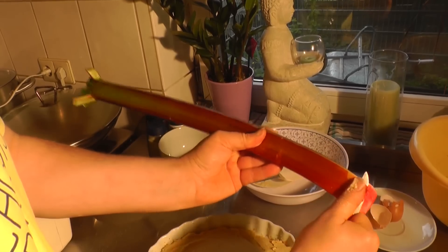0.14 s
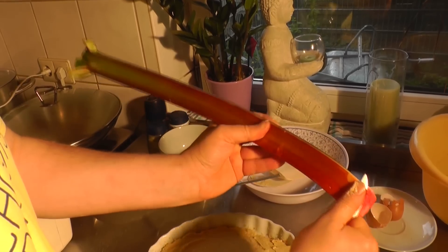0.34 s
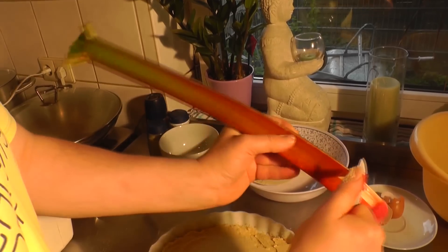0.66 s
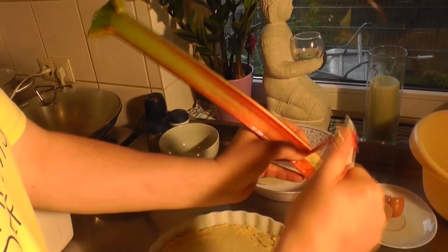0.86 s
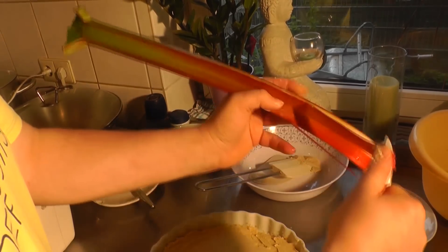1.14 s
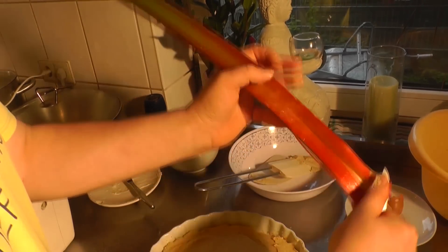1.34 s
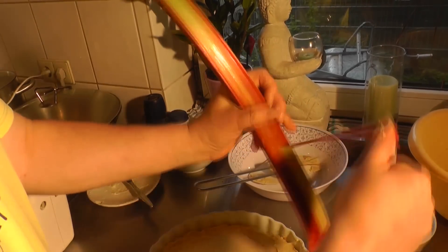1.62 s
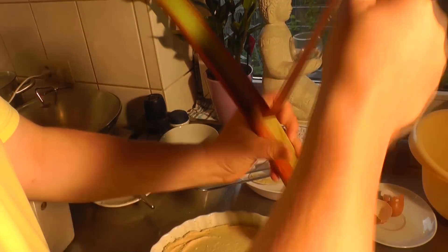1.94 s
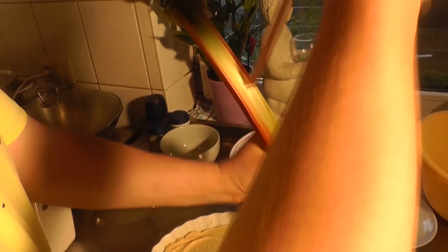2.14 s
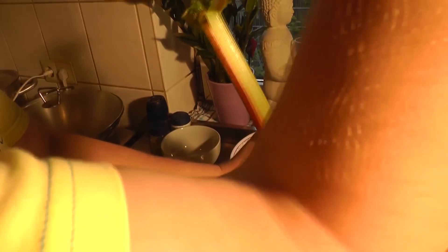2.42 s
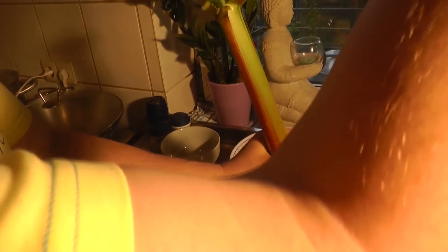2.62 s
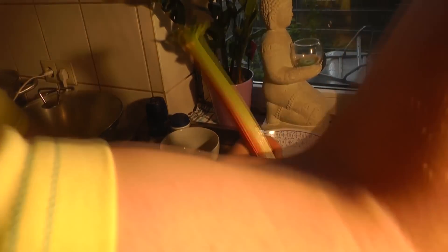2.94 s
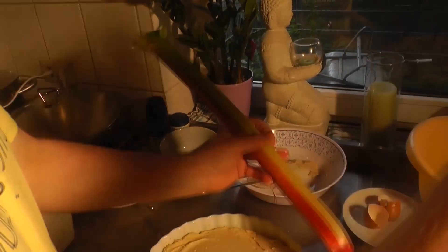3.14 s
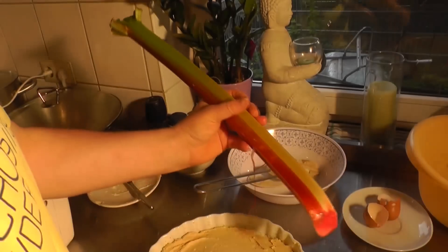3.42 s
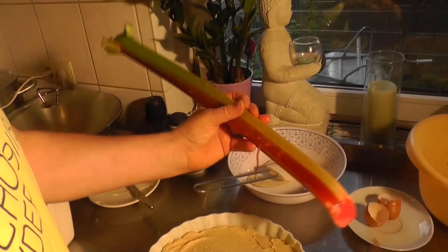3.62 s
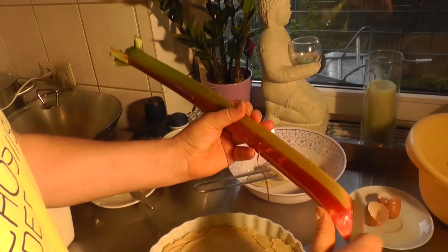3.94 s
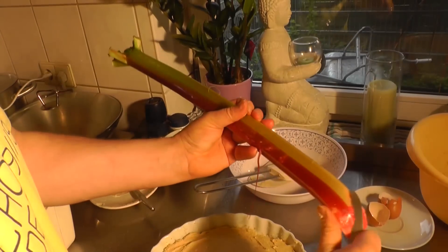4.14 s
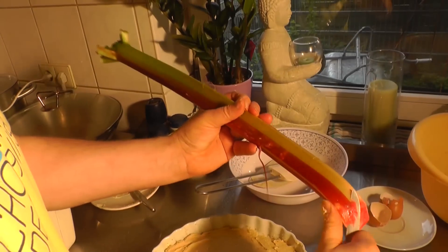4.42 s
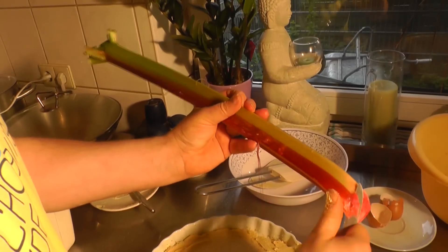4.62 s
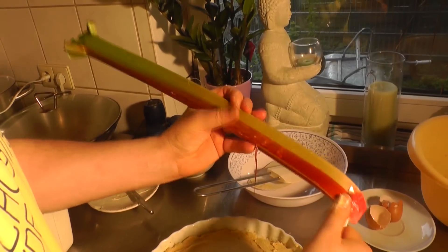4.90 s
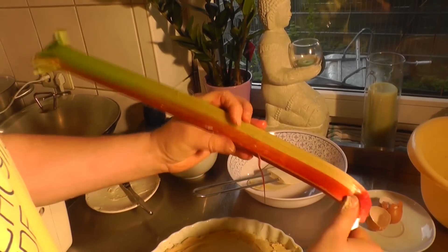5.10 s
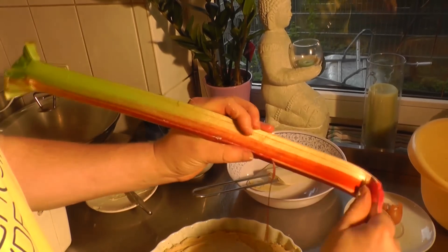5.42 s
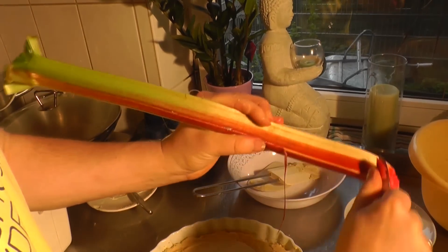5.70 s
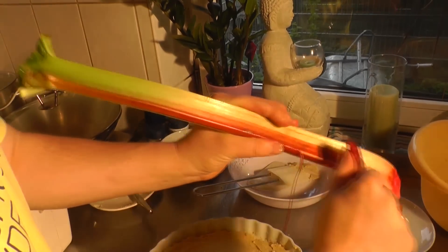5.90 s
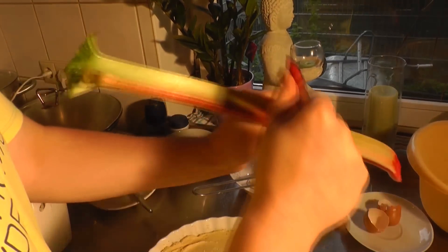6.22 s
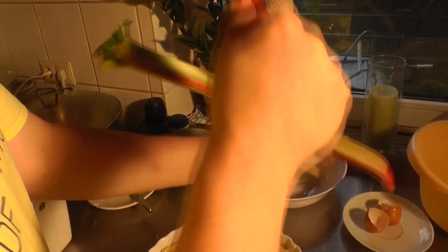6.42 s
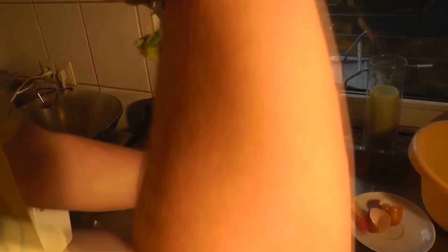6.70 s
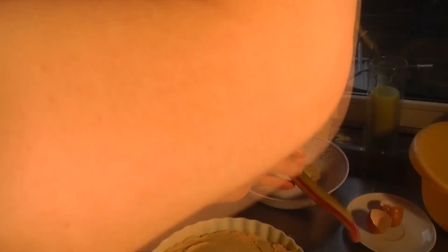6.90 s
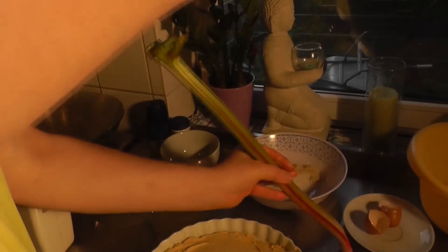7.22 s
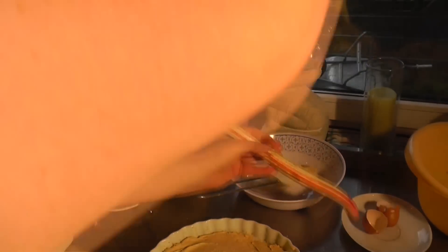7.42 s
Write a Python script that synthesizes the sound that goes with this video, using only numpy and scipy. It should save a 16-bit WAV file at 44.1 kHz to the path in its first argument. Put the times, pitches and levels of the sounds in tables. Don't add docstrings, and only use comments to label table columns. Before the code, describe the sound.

Stereo microphones stand close on the worktop. Short crisp rips and a tap come first, then a longer crackling pull ending in a loud thud with cupboard shudder and ringing dishes. Small knocks, clusters of dry snaps and a thin whistling peel follow. A dense tear leads to a final burst of thuds, clatter and wet ripping, over low traffic rumble and a quiet steady whine.

```python
import sys
import numpy as np
from scipy import signal
from scipy.fft import rfft, irfft, next_fast_len
from scipy.io import wavfile

SR = 44100
rng = np.random.default_rng(int(sys.argv[2]) if len(sys.argv) > 2 else 0)


def int16_out(signal):
    q = np.round(np.clip(np.atleast_2d(signal).T, -1, 1) * 32767)
    wavfile.write(sys.argv[1], SR, q.astype(np.int16))


def ratio(d):
    e = np.asarray(d, float) / 20
    return 10 ** e


N = 333340

# f/Hz, level/dB per Hz
FLOOR_SPECTRUM = [(12, -15), (30, -6), (123, 2.5), (204, -8), (357, 1.5), (825, -1), (1190, -7.5),
                  (1910, -3.5), (2140, -5.5), (2670, -1), (3950, -12), (5230, -8.5), (6910, -26),
                  (16000, -11)]
FLOOR_DB = -55.5
# f/Hz, width/Hz, level/dB rms
APPLIANCE_WHINE = [(2610, 170, -70), (2730, 130, -70), (1940, 43, -75), (3350, 94, -81)]

# closest t/s, rumble level/dB, tyre roar/dB re rumble, pane hum/dB re rumble, reach/s
PASSES = [(.02, -67, 2.5, -15, 0.086), (.52, -77, -12, 10, 0.14), (.8, -80, 4, 21, 0.15),
          (1.3, -62.5, 7.5, -3.5, 0.47), (1.75, -66, 10, -13, 0.22), (2.25, -77.5, 10.5, 5.5, 0.3),
          (2.85, -72, -13, -16, 0.16), (3.45, -65.5, 1, -1.5, 0.64), (4.35, -72, 17, 5, 0.045),
          (5.0, -55, 1, -18, 0.15), (5.22, -55.5, -1.5, 3.5, 0.11), (5.48, -54, -3.5, -13, 0.23),
          (5.8, -56, -7.5, -8, 0.19), (6.2, -70.5, 9.5, 6, 0.24), (6.65, -64, 9.5, -25, 0.25),
          (6.87, -64.5, 10, -4, 0.16)]
PASS_FALL_DB = 28.5
# f/Hz, level/dB per Hz
RUMBLE_SPECTRUM = [(53, -50.5), (90, -27), (162, -12), (269, -3.5), (454, -5.5), (706, -5.5), (999, -16.5),
                   (1600, -16), (1800, -29), (2200, -9), (2860, -39.5), (4840, -120)]
# f/Hz, width/Hz, level/dB
WINDOW_PEAKS = [(266, 15, -7.5), (309, 28, -2), (352, 69, 3), (491, 30, 1.5), (700, 74, 4.5),
                (939, 25, -2.5), (1196, 37, -3), (1375, 37, -1)]
PANE_HZ, PANE_WIDTH_HZ, ROAR_FROM_HZ = 210, 24, 329
# t/s, level/dB
BRAKE_SQUEAL = [
    (1.0, -90),
    (1.12, -62),
    (1.45, -58),
    (1.8, -74),
    (1.95, -90),
]
SQUEAL_HZ, SQUEAL_WIDTH_HZ = 1770, 42
# start t/s, length/s, start f/Hz, end f/Hz, level/dB
ENGINES = [
    (1.85, 0.52, 71.6, 76, -73),
    (4.51, 0.42, 67, 68.5, -72),
    (5.208, 0.35, 69.1, 73, -69),
    (5.84, .03, 76, 76, -82),
]
ENGINE_SWELL_DB_PER_S, ENGINE_FADE_DB_PER_S = 52, 149
# t/s, rumble level/dB, clatter/dB re rumble, hum/dB re rumble
SHUDDERS = [
    (2.55, -53.5, 3.5, -3),
    (3.07, -58, 3.5, 6),
    (3.24, -68, 0, 14),
    (3.7, -67, 8, -1),
    (3.8, -72, 6, 11),
    (7.05, -61, 19, -5),
    (7.19, -49, -25, 3),
    (7.27, -52, -3, 8),
    (7.54, -75.5, 18.5, -3),
]
SHUDDER_SWELL_DB_PER_S, SHUDDER_FADE_DB_PER_S = 205, 71

# start t/s, length/s, crackle start level/dB, end level/dB, wet low part/dB re crackle
PULLS = [(.0, 0.17, -65.5, -68, -38), (.17, 0.061, -67, -57, 0), (.36, 0.065, -65, -63.5, -22),
         (.55, 0.14, -63, -55.5, -7), (.73, 0.099, -39.5, -43.5, -8), (.93, 0.039, -46.5, -40.5, -7),
         (.99, 0.072, -38.5, -39, -12.5), (1.1, 0.35, -65, -57.5, 2), (1.74, 0.072, -54, -47, -5),
         (1.84, 0.54, -47, -42.5, -13.5), (2.44, 0.037, -28.5, -36.5, -15), (2.5, 0.11, -43.5, -43, -9),
         (2.74, 0.09, -64, -67, -34), (5.29, 0.032, -60, -61, -30), (2.9, 0.07, -63, -63, -4),
         (3.03, 0.12, -42.5, -61.5, -11), (3.2, 0.5, -66, -74, -3), (3.64, 0.087, -60, -70, 7),
         (4.27, 0.085, -54, -41.5, -8), (4.53, 0.16, -40.5, -58, -8.5), (4.71, 0.048, -54.5, -58, -4),
         (4.855, .035, -45, -54, -6.5), (4.9, 0.12, -48, -49.5, 0.5), (5.9, .08, -78, -50, -29),
         (6.0, 0.028, -45, -40, -21), (6.2, 0.03, -47, -44, -26), (6.06, .15, -35.5, -34, -19.5),
         (6.26, 0.42, -36.5, -37.5, -14.5), (6.68, 0.32, -38.5, -44.5, -14.5), (7.015, 0.2, -40, -46, -2.5),
         (7.27, 0.22, -39.5, -62, 1), (7.39, 0.023, -59, -54, -23)]
THIN_STRIP = (5, 1.88, -47.5, -54.5, -13.5)
THIN_WHISTLE_SHARE, WHISTLE_HZ, WHISTLE_WIDTH_HZ = 0.33, 6700, 750
GRIP_DB_PER_S, LET_GO_DB_PER_S = 520, 303
HOLDING_DB, HOLDING_LOW_DB = -72, -28
# f/Hz, level/dB per Hz
SKIN_SPECTRUM = [(1290, -105), (2200, -6.5), (2730, -13), (4050, -5), (4510, -1), (5870, -0.5), (8580, -7),
                 (11100, -9.5), (13500, -12), (15000, -22), (15800, -16)]
PATCH_EDGES_HZ = [1200, 2600, 3600, 4600, 5600, 6800, 8400, 10500, 13000, 18000]
# t/s, level/dB, low part/dB, rise/s, length/s
RIPS = [(0.151, -26.5, -9, 0.0013, 0.028), (0.622, -48, -12, 0.0026, 0.012),
        (0.692, -32, -36, 0.022, 0.023), (1.162, -46, -11, 0.011, 0.069), (1.229, -41.5, -9, 0.044, 0.033),
        (1.343, -43.5, -18, 0.013, 0.011), (1.453, -46, -5, 0.0051, 0.058),
        (1.566, -47.5, -0.5, 0.0025, 0.053), (2.422, -26.5, 0.5, 0.00088, 0.052),
        (3.006, -30, -9.5, 0.016, 0.029), (3.563, -54, 0, 0.0036, 0.024), (3.623, -49, -19, 0.011, 0.057),
        (3.279, -57, -19, 0.03, 0.081), (4.252, -51, -33, 0.0092, 0.05), (4.307, -36.5, -7, 0.015, 0.027),
        (4.398, -41.5, -8, 0.0048, 0.038), (4.523, -29.5, -8, 0.012, 0.0069),
        (4.891, -30.5, -12, 0.0053, 0.024), (5.068, -33, -7, 0.0042, 0.022),
        (7.374, -29.5, -27, 0.00059, 0.01), (5.888, -39.5, -30, 0.22, 0.048),
        (7.007, -24.5, 0, 0.0022, 0.026), (7.206, -34, -35, 0.038, 0.1)]
# t/s, peak level/dB, f/Hz, low part/dB
SNAPS = [(0.1563, -21.5, 6660, -13), (0.741, -27.5, 6100, -31), (1.7283, -46.5, 7470, -11),
         (1.7675, -44, 6770, 1), (2.4268, -21.5, 5800, -18), (4.171, -46.5, 6420, 1),
         (4.5296, -24, 7860, -17), (4.57, -28, 5200, -19), (4.595, -33, 5660, -20), (4.805, -37, 6000, -16),
         (4.853, -35, 7400, -20), (4.8725, -36, 8700, -28), (4.899, -33, 6120, -20),
         (5.0666, -29, 6500, -26), (5.074, -28, 6500, -20), (5.446, -26.5, 9300, -30),
         (5.6872, -33, 6570, -8), (5.737, -27.5, 7700, -29), (6.005, -33, 5930, -24),
         (6.1152, -22.5, 5830, -25), (6.1562, -29, 5760, -24), (6.1805, -21, 6900, -14),
         (7.01, -25.5, 7000, 6)]
SNAP_S = .0011
SNAP_SPAN, SNAP_BROAD, SNAP_PITCHED = 1.75, .9, 1.1

# t/s, level/dB, f/Hz, t60/s
TAPS = [(.156, -47, 307, .17), (1.165, -57, 3950, .08), (1.278, -54, 5200, .06), (1.475, -56, 4050, .06),
        (2.427, -31, 510, .1), (2.429, -38, 1260, .31), (2.433, -39, 1600, .28), (2.45, -35.5, 1400, .23),
        (3.061, -60, 108, .45), (3.251, -56, 108, .37), (3.6995, -38, 578, .11), (3.702, -46, 240, .08),
        (3.815, -52, 700, .08), (4.699, -38, 690, .052), (4.6995, -43, 1150, .04), (4.7, -50, 266, .15),
        (4.924, -43.5, 686, .08), (6.996, -38, 4450, .16), (7.011, -35, 700, .1), (7.008, -33, 1590, .12),
        (7.006, -32, 1240, .16), (7.02, -29, 206, .28), (7.3, -41, 1330, .12), (7.278, -40, 4450, .11),
        (7.5365, -47.5, 710, .068), (.155, -48, 1780, .15), (1.04, -56, 1660, .12), (2.414, -32, 205, .08),
        (2.43, -28, 105, .2), (2.428, -24, 335, .08), (2.425, -23, 600, .09), (2.426, -34, 845, .2),
        (2.43, -31, 1096, .2), (2.427, -28, 700, .2), (2.444, -24, 460, .1), (2.456, -26, 340, .15),
        (2.482, -30, 208, .12), (2.535, -33, 345, .2), (7.012, -27, 380, .15), (3.625, -51, 610, .1),
        (3.88, -52, 410, .06), (7.2, -35, 200, .15), (7.232, -34, 250, .15), (7.28, -36, 108, .25),
        (7.285, -28, 270, .15)]
TAP_SWELL_CYCLES = 0.35
# t/s, peak level/dB, push f/Hz, rattle/dB re push, length/s
BUMPS = [(0.159, -29.5, 623, -3, 0.0087), (2.415, -10, 193, -21, 0.047), (2.42, -7, 314, -10.5, 0.011),
         (2.434, -21.5, 470, 2, 0.036), (2.458, -9, 366, -36, 0.017), (2.489, -23, 210, -4, 0.039),
         (3.033, -33, 343, -13, 0.022), (3.236, -32, 186, -24, 0.0066), (3.621, -38, 590, -11, 0.036),
         (3.699, -31, 393, -9, 0.041), (3.824, -37, 397, -13, 0.02), (4.066, -42, 346, -17, 0.006),
         (4.335, -36.5, 560, -31, 0.042), (4.702, -32, 274, 0, 0.0013), (4.921, -29.5, 226, -26, 0.0086),
         (6.993, -15, 145, -23, 0.053), (7.01, -8.5, 420, -11, 0.036), (7.04, -16.5, 236, -4, 0.019),
         (7.27, -10.5, 330, -12, 0.0095), (7.287, -15.5, 304, -4.5, 0.017), (7.311, -18.5, 560, -14, 0.037),
         (7.346, -19, 266, -19, 0.0035), (7.533, -38, 243, -29, 0.025)]
# f/Hz, level/dB, t60/s
WORKTOP_MODES = [(103, -2, 0.15), (171.2, 5, 0.44), (208, -20, 0.24), (274, 0.5, 0.34), (342, -6.5, 0.48),
                 (379.8, 1, 0.62), (452, -30, 0.3), (517, -9, 0.52), (614, -5.5, 0.028), (719, 3.5, 0.43),
                 (865, -32, 0.16), (1120, -14, 0.46), (1250, 0.5, 0.042), (1640, -26, .25)]
BUMP_RISE_S, BUMP_LEAN_DB = 0.0022, -1.5
JOLT_DB, JOLT_HZ = -38, 50
# t/s,
# level/dB, f/Hz, t60/s, swell/s
RINGS = [(2.436, -35, 1280, .1, 0.0068), (2.437, -30, 1664, .08, .004), (2.45, -37, 1620, .1, .005),
         (2.472, -35, 942, 0.065, 0.0043), (2.415, -38, 1404, 0.071, 0.0046),
         (2.418, -34, 1905, 0.14, .004), (2.486, -32, 1303, 0.11, 0.0044), (2.49, -27.5, 540, 0.11, 0.0035),
         (2.527, -40, 790, .08, 0.0054), (2.555, -32.5, 358, 0.14, 0.0087),
         (3.713, -42.5, 195, 0.11, 0.015), (3.728, -48, 596, .07, .004), (3.772, -45, 584, .15, 0.0079),
         (3.79, -52, 224, 0.081, 0.0074), (3.826, -43, 545, .14, 0.0072), (3.832, -51, 217, 0.09, .008),
         (3.65, -48, 690, .15, 0.009), (4.557, -36, 5050, 0.033, .0005), (4.857, -44, 4900, 0.027, .0005),
         (4.921, -37.5, 268, 0.041, 0.00078), (4.936, -38, 297, .05, .002), (4.5267, -34, 4650, .03, .0005),
         (7.288, -31.5, 270, .1, 0.0045), (5.083, -35, 6140, 0.014, 0.00033),
         (7.012, -28.5, 2125, 0.094, 0.0037), (7.037, -25.5, 577, 0.26, 0.0053),
         (7.037, -32, 1574, 0.1, 0.0046), (7.038, -22, 201, 0.062, 0.005), (7.13, -39, 287, .3, .012),
         (7.274, -24.5, 700, 0.21, .01), (7.276, -26.5, 351, 0.088, 0.0041), (7.295, -31, 588, 0.17, .008),
         (7.308, -29, 248, 0.11, 0.0079), (7.343, -36, 320, 0.11, .005)]

# f/Hz, t60/s
KITCHEN_DECAY = [(60, 0.62), (250, 0.33), (1000, 0.29), (4000, 0.35), (9000, 0.23), (15000, 0.82)]
ROOM_EDGES_HZ = 20 * 2 ** np.arange(0, 10.1, 1)
ROOM_LOW_CUT_HZ, HANDS_MOVE_S = 192, .17
# f/Hz, left minus right level/dB
STEREO_LEAN = [(60, -1), (240, -0.5), (950, 0), (3770, 2), (15000, -0.5)]
# f/Hz, side minus mid level/dB
SIDE_LEVEL = [(60, -4), (120, -7.5), (240, -13), (480, -9.5), (950, -1), (1890, -2), (3770, -8.5),
              (7520, -11), (15000, 0)]
# f/Hz, level/dB
MICROPHONE = [(20, 7.5), (95, 4), (1700, 0), (2150, -5), (2600, 2.5), (10000, 5.5), (13000, -9.5),
              (15750, -4), (15900, -46), (22050, -63)]
SCATTER_DB, SCATTER_FROM_HZ = -5.5, 9400


def rms_one(x):
    return x / np.sqrt(np.mean(x ** 2) + 1e-30)


def at_hz(points, hz):
    table_hz, values = np.array(points).T
    return np.interp(np.log(hz), np.log(table_hz), values)


def colour(x, spectrum):
    hz = np.fft.rfftfreq(x.shape[-1], 1 / SR) + 1
    return irfft(rfft(x) * ratio(at_hz(spectrum, hz)), x.shape[-1])


def drift(rate):
    r = np.exp(-80 * np.pi * rate / SR)
    slow = signal.lfilter([1], [1, -2 * r, r * r], rng.standard_normal(N // 40 + 2002))
    slow = slow[2000:]
    return np.interp(np.arange(N) / 40, np.arange(len(slow)), rms_one(slow))


def resonance(x, hz, width_hz):
    r = np.exp(-np.pi * max(width_hz, 1) / SR)
    top_gain = np.array([1, 0, -1]) * (1 - r * r) / 2
    return signal.lfilter(top_gain, [1, -2 * r * np.cos(2 * np.pi * hz / SR), r * r], x)


def sharp_resonance(x, hz, width_hz):
    return resonance(resonance(x, hz, width_hz), hz, width_hz)


def band(x, low_hz, high_hz):
    edges = [low_hz, min(high_hz, .45 * SR)]
    return signal.sosfilt(signal.butter(2, edges, "band", fs=SR, output="sos"), x)


def contact(t, length_s, rise_s):
    swell = np.minimum(t / max(rise_s, 5e-5), 1)
    return swell ** 2 * np.exp(-np.maximum(t - rise_s, 0) / max(length_s, 2e-4))


def held_db(start, length, first_db, last_db, rise_db_per_s, fall_db_per_s):
    t = np.arange(N) / SR
    before, after = np.maximum(start - t, 0), np.maximum(t - start - length, 0)
    glide_db = np.interp(t, [start, start + length], [first_db, last_db])
    return glide_db - rise_db_per_s * before - fall_db_per_s * after


def diffuse(size):
    mid, side = rfft(rng.standard_normal((2, size)))
    hz = np.fft.rfftfreq(size, 1 / SR) + 1
    left_right = np.array([[1], [-1]])
    lean = ratio(at_hz(STEREO_LEAN, hz) / 2 * left_right)
    return irfft(lean * (mid + ratio(at_hz(SIDE_LEVEL, hz)) * side * left_right), size)


def kitchen(x, wet_db, gap_s, count=1):
    t = np.arange(SR // 2) / SR
    noise, out = diffuse(len(t)), x
    for k in range(count):
        shifted = np.roll(noise, k * SR // 10, axis=1)
        tail = 0
        for low, high in zip(ROOM_EDGES_HZ, ROOM_EDGES_HZ[1:]):
            tail = tail + band(shifted, low, high) * ratio(-60 * t / at_hz(KITCHEN_DECAY, low))
        tail = band(tail, ROOM_LOW_CUT_HZ, 20000) * (1 - np.exp(-(t / gap_s) ** 2))
        tail = rms_one(tail) / np.sqrt(len(t))
        place = np.arange(N) / SR / HANDS_MOVE_S
        apart = np.abs((place - k + count / 2) % count - count / 2)
        here = np.cos(np.pi / 2 * np.minimum(apart, 1)) if count > 1 else 1
        out = out + ratio(wet_db) * signal.fftconvolve((here * x)[None], tail, axes=1)[:, :N]
    return out


def room_tone():
    noise, whine = diffuse(N), 0
    for hz, width, db in APPLIANCE_WHINE:
        whine = whine + ratio(db + drift(7.7)) * rms_one(sharp_resonance(noise, hz, width))
    return ratio(FLOOR_DB - 7.5) * rms_one(colour(diffuse(N), FLOOR_SPECTRUM)) + whine


def street():
    t = np.arange(N) / SR
    levels_db = []
    for s, db, _, _, reach in PASSES:
        levels_db.append(db - PASS_FALL_DB * np.log10(1 + ((t - s) / reach) ** 2))
    for s, db, _, _ in SHUDDERS:
        levels_db.append(held_db(s, 0, db, db, SHUDDER_SWELL_DB_PER_S, SHUDDER_FADE_DB_PER_S))
    power = ratio(2 * np.array(levels_db))
    shares_db = np.array([row[2:4] for row in PASSES + SHUDDERS]).T
    roar_gain, pane_gain = np.sqrt(ratio(2 * shares_db) @ power)

    noise, lumps = colour(diffuse(N), RUMBLE_SPECTRUM), drift(14.0)
    rumble = band(noise, 126, ROAR_FROM_HZ)
    roar = band(noise[:, ::-1], ROAR_FROM_HZ - 40, 1730) * ratio(lumps)
    boom = 0
    for k, (hz, width, db) in enumerate(WINDOW_PEAKS):
        peak = rms_one(sharp_resonance(noise[::-1], hz, width))
        boom = boom + ratio(db + 2.7 * np.roll(lumps, k * SR)) * peak
    pane = sharp_resonance(noise, PANE_HZ, PANE_WIDTH_HZ)
    squeal = sharp_resonance(noise, SQUEAL_HZ, SQUEAL_WIDTH_HZ)
    squeal_db = np.interp(t, *np.transpose(BRAKE_SQUEAL))

    traffic = np.sqrt(power.sum(axis=0)) * rms_one(rumble)
    traffic = traffic + roar_gain * (rms_one(roar) + ratio(-6.0) * rms_one(boom))
    traffic = traffic + ratio(-6.0) * pane_gain * rms_one(pane)
    return traffic + ratio(squeal_db) * rms_one(squeal) + engines()


def tearing(per_s, spread_db, clump_db, patch_db):
    rows = [*PULLS, THIN_STRIP]
    pulls = np.array([ratio(2 * held_db(*row[:4], GRIP_DB_PER_S, LET_GO_DB_PER_S)) for row in rows])
    low = ratio(2 * np.array(rows)[:, 4]) @ pulls + ratio(2 * (HOLDING_DB + HOLDING_LOW_DB))
    singing = THIN_WHISTLE_SHARE * pulls[-1]
    crackle = pulls.sum(axis=0) - singing + ratio(2 * HOLDING_DB)

    sizes = ratio(spread_db * np.minimum(rng.exponential(1, N), 5)) * rng.standard_normal(N)
    clumps = drift(41)
    clicks = sizes * (rng.random(N) < per_s / SR) * ratio(clump_db * clumps)
    skin, broad = colour(clicks, SKIN_SPECTRUM), 0
    for k, (low_hz, high_hz) in enumerate(zip(PATCH_EDGES_HZ, PATCH_EDGES_HZ[1:])):
        patch = ratio(patch_db * np.roll(clumps, k * SR))
        broad = broad + band(skin, low_hz, high_hz) * patch * (-1) ** k
    whistle = rms_one(resonance(np.roll(clicks, SR), WHISTLE_HZ, WHISTLE_WIDTH_HZ))
    wet = rms_one(band(clicks, 810, 2140))
    dry_part = np.sqrt(crackle) * rms_one(broad) + np.sqrt(singing) * whistle
    return ratio(-5.5) * (dry_part + np.sqrt(low) * wet)


def through_skin(bright, dull):
    return 0.87 * colour(bright[:N], SKIN_SPECTRUM) + 0.96 * band(dull[:N], 580, 3370)


def rips():
    bright, dull, t = np.zeros(N + SR), np.zeros(N + SR), np.arange(SR // 5) / SR
    for s, db, low_db, rise, length in RIPS:
        rip = ratio(db) * rng.standard_normal(len(t)) * contact(t, length, rise)
        bright[round(s * SR):][:len(t)] += rip
        dull[round(s * SR):][:len(t)] += ratio(low_db) * rip
    return through_skin(bright, dull)


def damped_tones(rows):
    out, t = np.zeros(N + SR), np.arange(SR // 4) / SR
    for s, db, hz, t60, swell in rows:
        level = ratio(db - 60 * t / t60) * np.minimum(t / max(swell, 1e-4), 1)
        out[round(s * SR):][:len(t)] += level * np.sin(2 * np.pi * hz * t)
    return out[:N]


def taps():
    return damped_tones([(*row, TAP_SWELL_CYCLES / row[2]) for row in TAPS])


def snaps():
    bright, dull, t = np.zeros(N + SR), np.zeros(N + SR), np.arange(SR // 100) / SR
    for s, db, hz, low_db in SNAPS:
        crack = ratio(db - 10.0) * rms_one(rng.standard_normal(len(t)) * np.exp(-t / SNAP_S))
        broad = SNAP_BROAD * band(crack, hz / SNAP_SPAN, hz * SNAP_SPAN)
        bright[round(s * SR):][:len(t)] += broad + SNAP_PITCHED * resonance(crack, hz, 2100)
        dull[round(s * SR):][:len(t)] += ratio(low_db) * crack
    return through_skin(bright, dull)


def bumps():
    push, t = np.zeros(N + SR), np.arange(SR // 8) / SR
    for s, db, hz, rattle_db, length in BUMPS:
        knock = rng.standard_normal(len(t)) * contact(t, length, BUMP_RISE_S)
        blow = np.sin(2 * np.pi * hz * t) * np.exp(-t * hz / 1.55) * np.minimum(t / BUMP_RISE_S, 1)
        thud = blow + 3.58 * band(band(knock, hz / 2.93, hz * 2.36), 31, 920)
        rattle = 2.65 * ratio(rattle_db) * band(band(knock, 476, 2400), 600, 4050)
        push[round(s * SR):][:len(t)] += ratio(db - 10.5) * (thud + rattle)
    push = push[:N] + 1e-18
    jolt = ratio(JOLT_DB) * band(push, 15, JOLT_HZ)
    push = band(band(push, 95, 9000), 90, 12000)
    ringing = 0
    for k, (hz, db, t60) in enumerate(WORKTOP_MODES):
        ringing = ringing + ratio(db + 6.5) * resonance(push, hz, 3.15 / min(t60, .4)) * (-1) ** k
    return push + ringing + jolt


def engines():
    out, t, waver_hz = 0, np.arange(N) / SR, 2.1 * drift(4.9)
    for s, length, first_hz, last_hz, db in ENGINES:
        hz = np.interp(t, [s, s + length], [first_hz, last_hz]) + waver_hz
        level = ratio(held_db(s, length, db, db, ENGINE_SWELL_DB_PER_S, ENGINE_FADE_DB_PER_S))
        out = out + level * np.sqrt(2) * np.sin(2 * np.pi * np.cumsum(hz) / SR)
    return out


def rings():
    return damped_tones(RINGS)


def scene():
    stalk = tearing(per_s=9000, spread_db=-1.5, clump_db=-0.47, patch_db=1.23) + rips() + snaps()
    stalk = kitchen(stalk, wet_db=0.0, gap_s=0.0017, count=4)
    worktop = kitchen(bumps() + taps() + rings(), wet_db=0.5, gap_s=0.00064)
    worktop = worktop * ratio([[BUMP_LEAN_DB / 2], [-BUMP_LEAN_DB / 2]])
    return stalk + worktop + street() + room_tone()


def top_cut(x):
    return signal.sosfilt(signal.butter(12, 16460, fs=SR, output="sos"), x)


def record(dry):
    top = band(dry.mean(axis=0), SCATTER_FROM_HZ, 17600)
    top = signal.hilbert(top, next_fast_len(N))[:N]
    scatter = ratio(SCATTER_DB) * np.real(top * np.exp(4j * drift(30)))
    mix = colour(dry + scatter * [[1], [-1]], MICROPHONE)
    return top_cut(mix)


dry = scene()
out = record(dry)
int16_out(out)
```